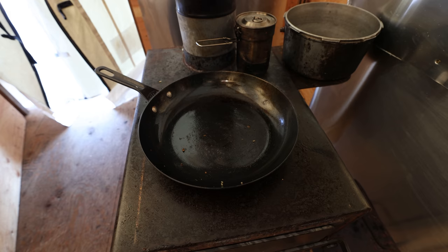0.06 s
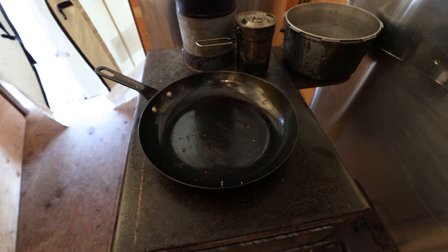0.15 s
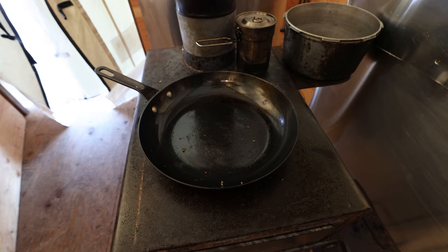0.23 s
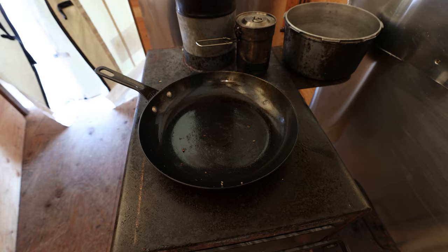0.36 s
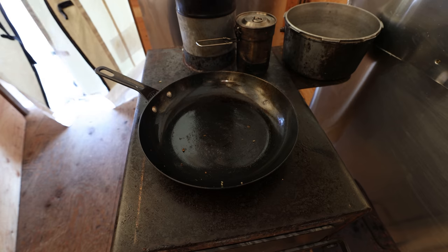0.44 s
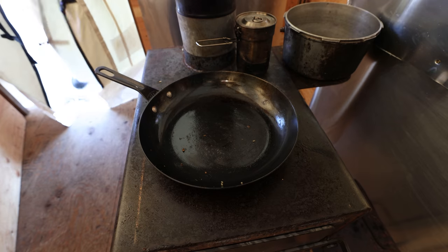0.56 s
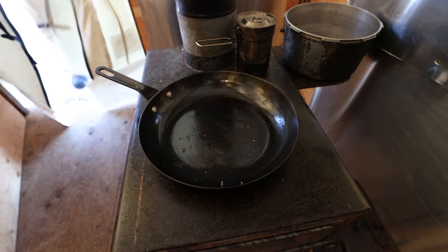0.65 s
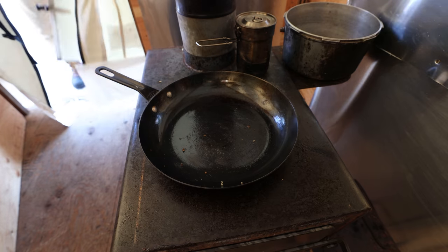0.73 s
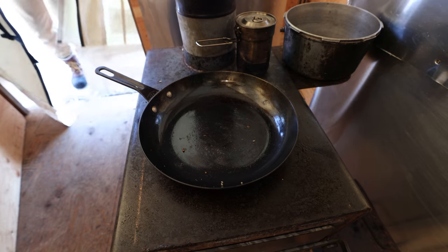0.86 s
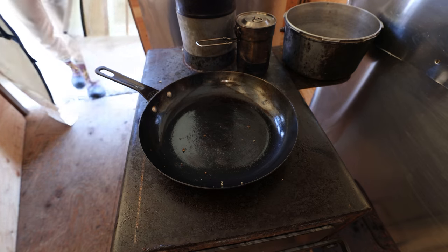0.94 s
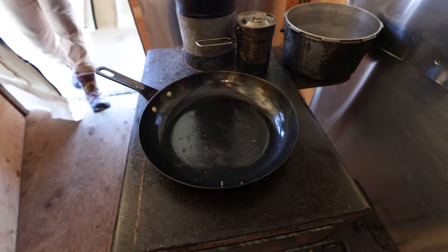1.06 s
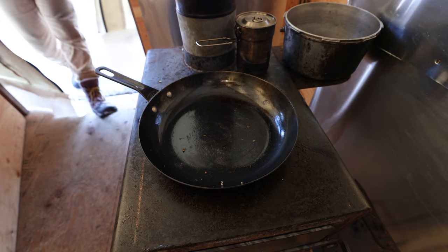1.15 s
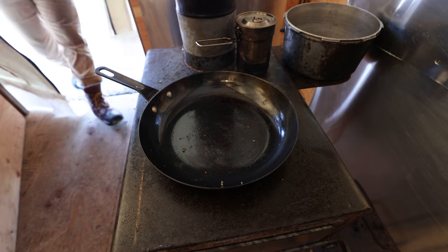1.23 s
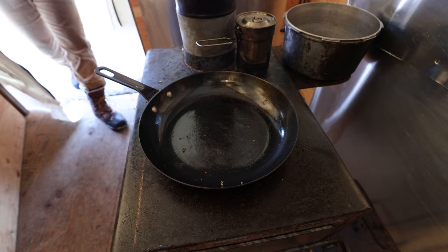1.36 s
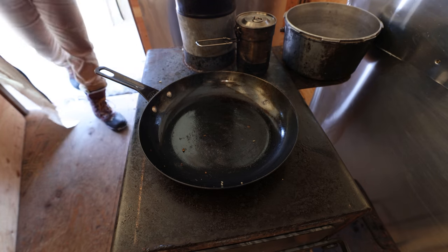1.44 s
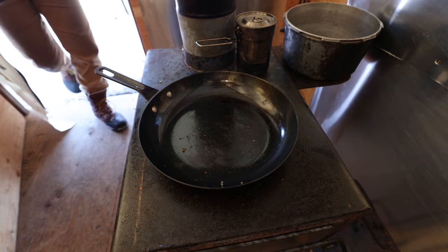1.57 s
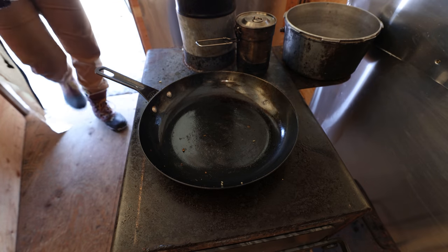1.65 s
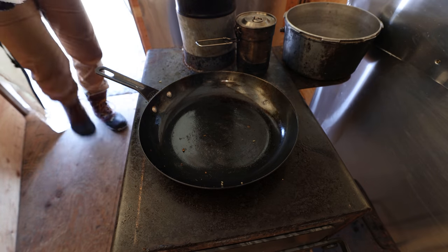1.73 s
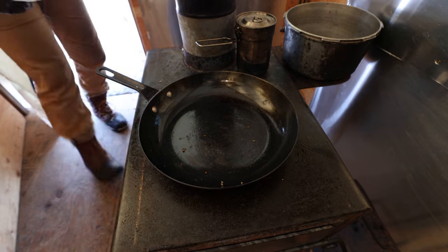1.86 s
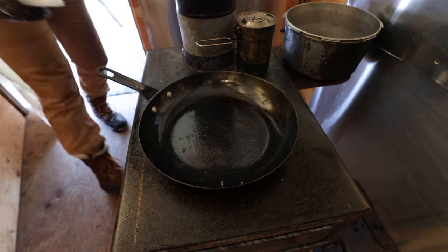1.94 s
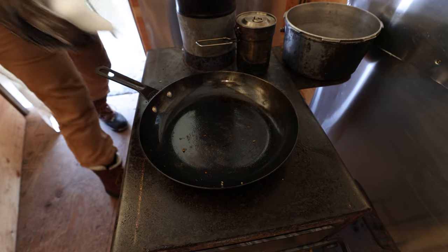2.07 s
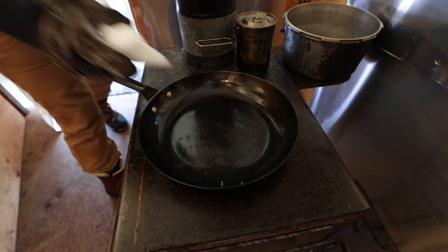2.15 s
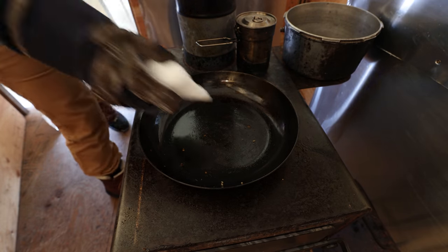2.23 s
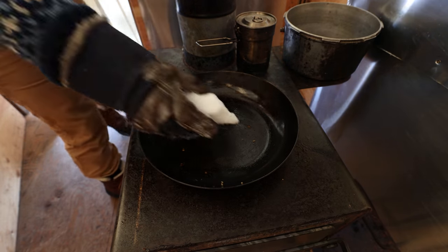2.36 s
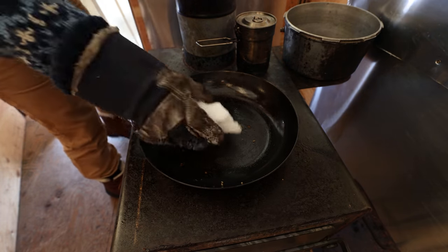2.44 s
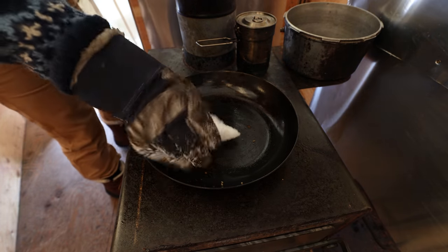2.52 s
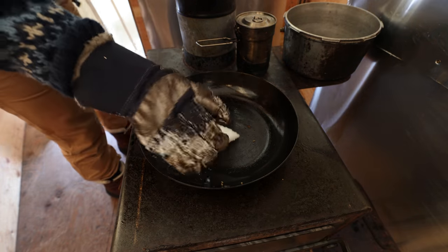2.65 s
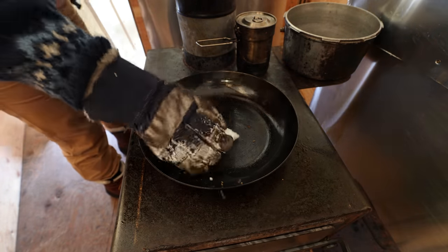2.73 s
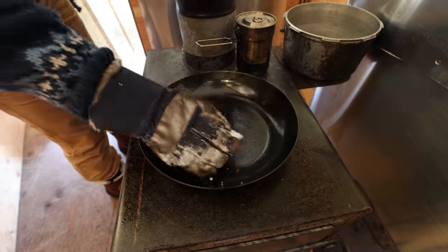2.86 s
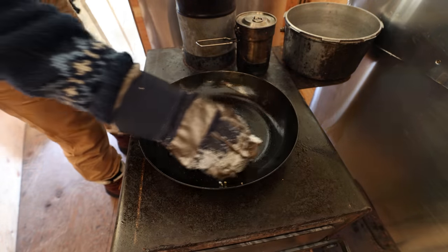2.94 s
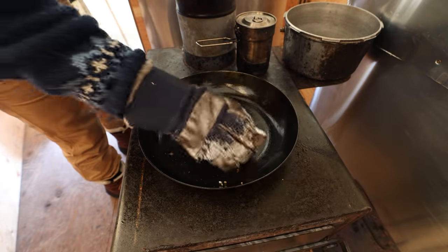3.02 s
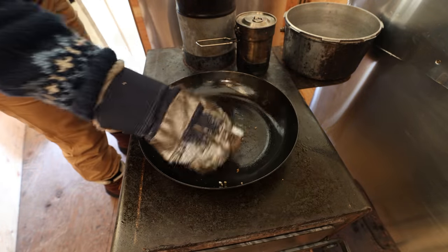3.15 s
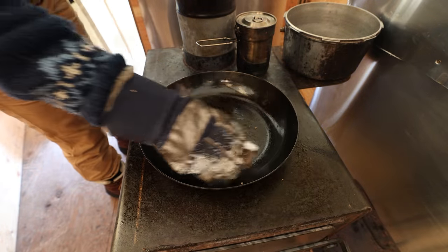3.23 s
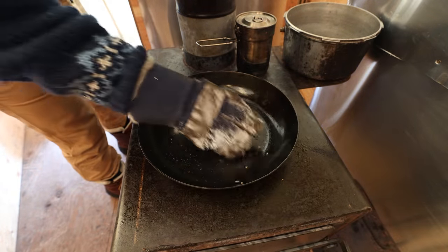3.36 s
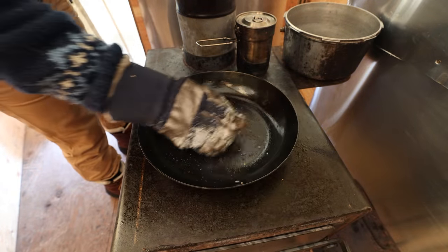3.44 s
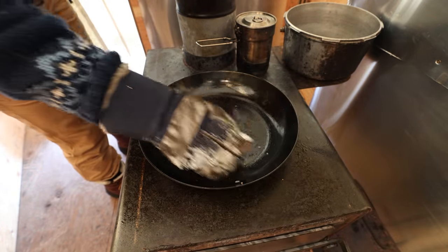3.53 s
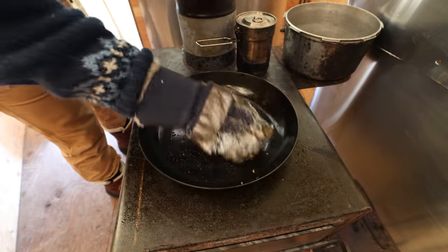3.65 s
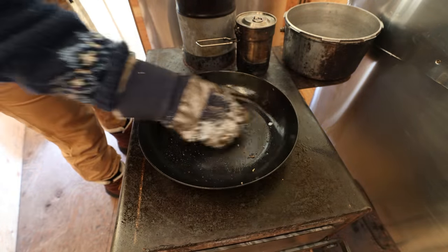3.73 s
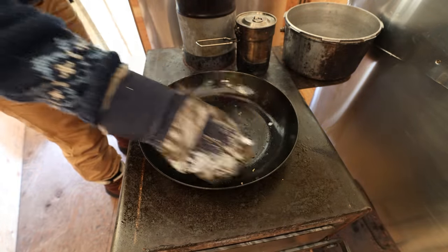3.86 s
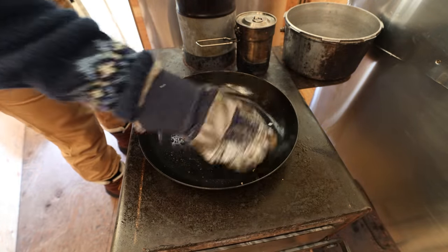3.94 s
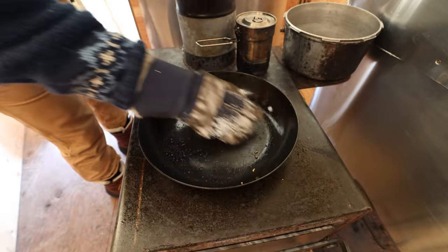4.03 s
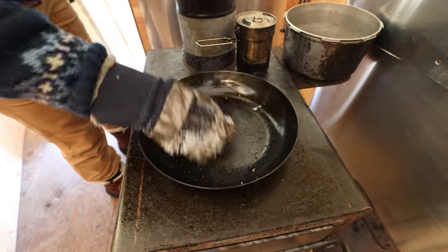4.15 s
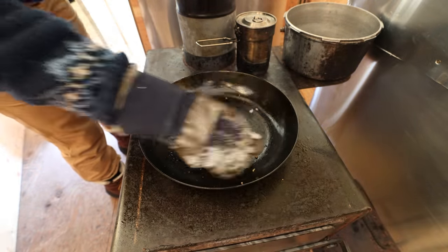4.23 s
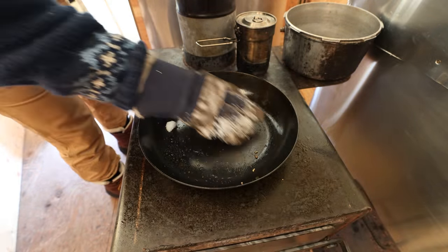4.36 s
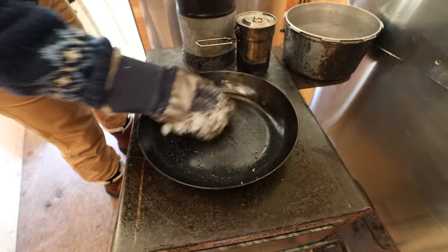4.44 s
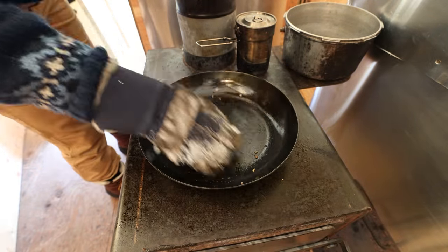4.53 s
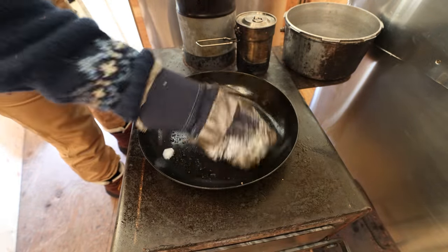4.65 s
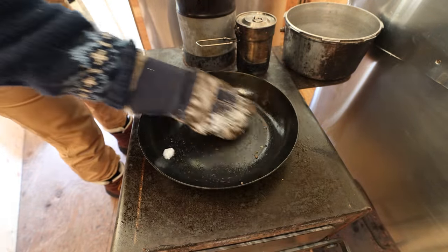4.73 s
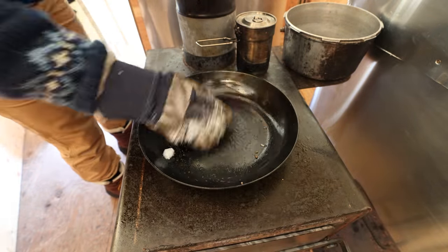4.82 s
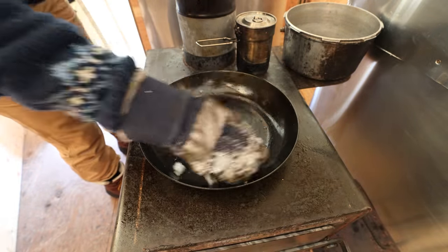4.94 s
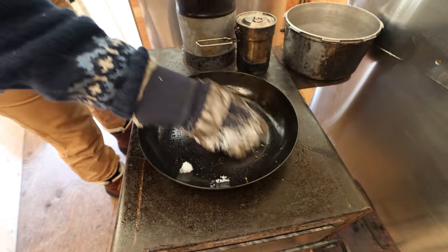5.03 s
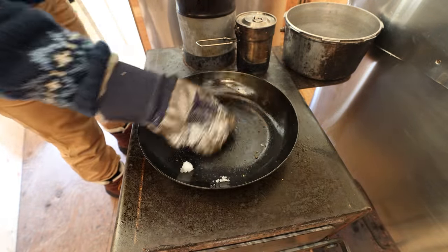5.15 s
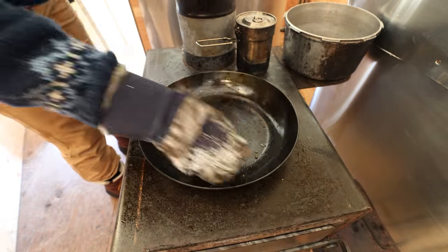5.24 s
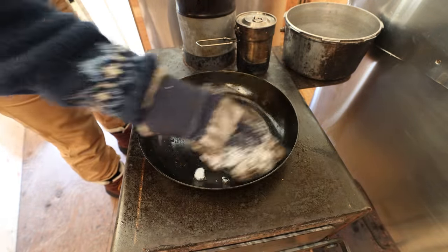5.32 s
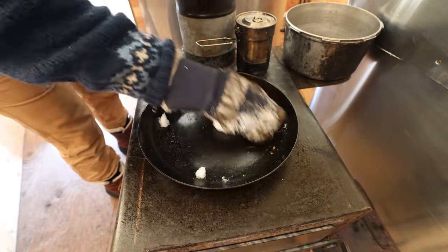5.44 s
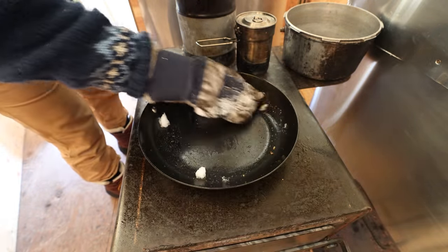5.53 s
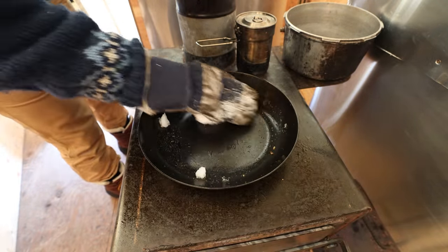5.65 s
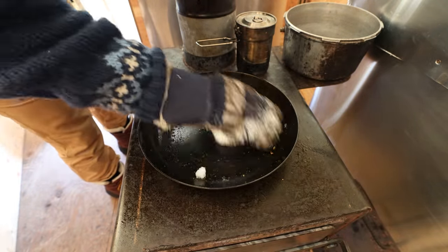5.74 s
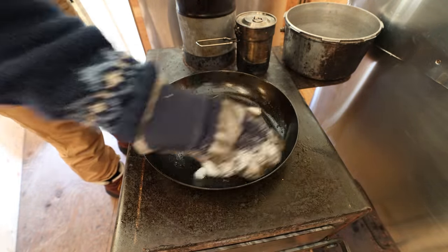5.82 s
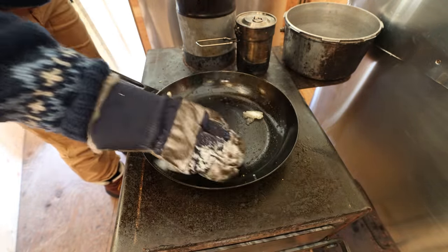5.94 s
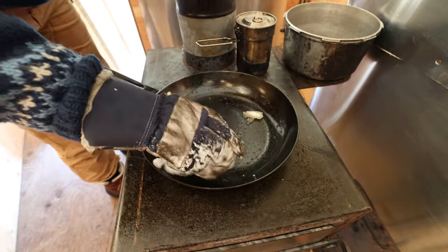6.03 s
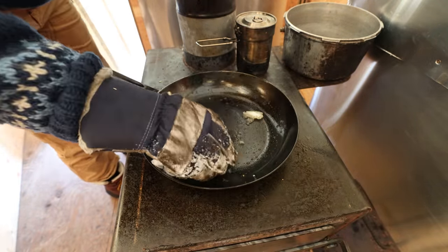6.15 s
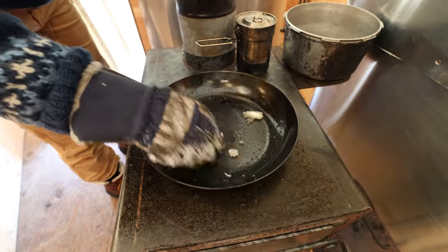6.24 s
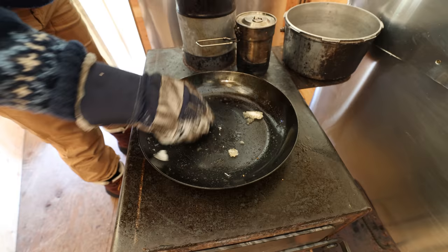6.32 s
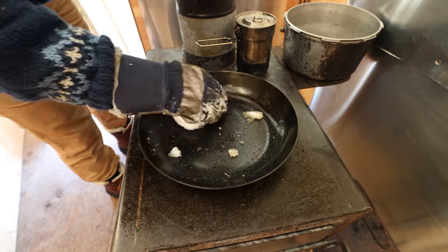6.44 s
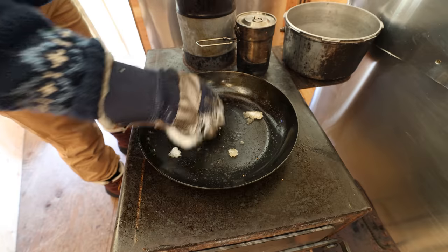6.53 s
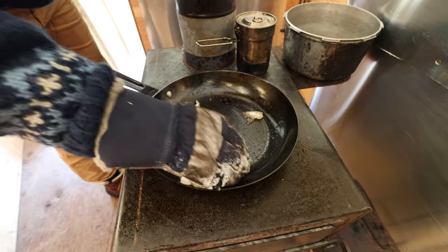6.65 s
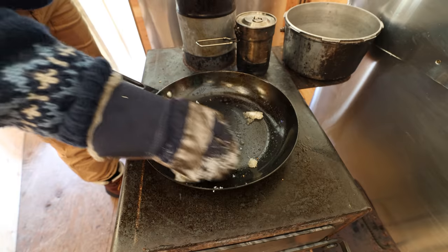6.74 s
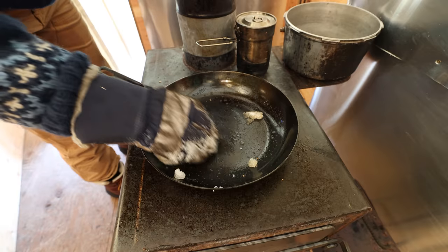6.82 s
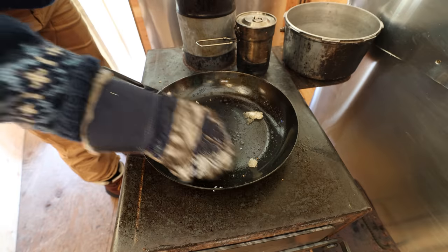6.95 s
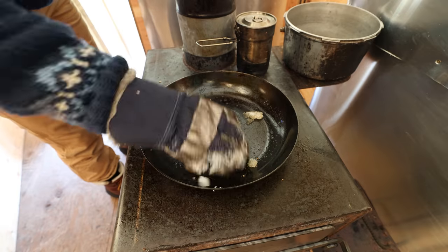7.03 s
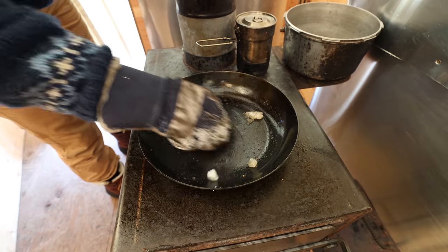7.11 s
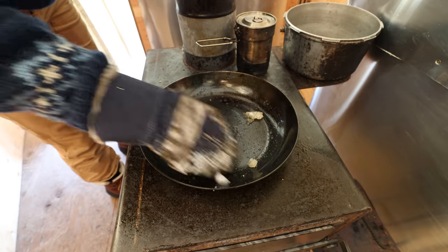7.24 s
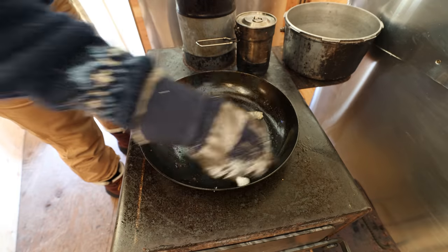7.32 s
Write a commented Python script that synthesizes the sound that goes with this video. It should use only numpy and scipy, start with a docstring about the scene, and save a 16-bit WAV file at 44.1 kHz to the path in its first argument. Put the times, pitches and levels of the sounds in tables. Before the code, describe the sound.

Near microphone by the pan, short dry tent reflections. Someone a little farther off comes through a canvas flap with soft rustles, crackling snaps and low footfalls. Two hard metallic, crumbly blows land close together, loose grains scatter, and coarse snow scrubs rhythmically over ringing steel under a mitten. Later strokes are quieter and broken up, while the pan shifts and clunks on the stove top.

```python
"""A stove rumbles unevenly over a faint hiss in a tent. Someone steps in through the canvas flap: cloth rustles as
clumped grains, snaps are gritty bursts through a resonance, boots thud as decaying sines. From about 2.5 s a lump
of coarse snow is knocked on a steel pan, ringing its modes; loose snow scatters. The pan shifts and knocks on the
stove top as the lump is scrubbed round with a mitten, its crystals heard directly and through the pan's modes."""
import sys
import numpy as np
from scipy import signal
from scipy.fft import rfft, irfft, next_fast_len
from scipy.io import wavfile
from scipy.ndimage import uniform_filter1d, map_coordinates

SR = 44100
rng = np.random.default_rng(int(sys.argv[2]) if len(sys.argv) > 2 else 0)


def digitize_waveform(pressure):
    """Quantize a signal to 16-bit integers and store it at the path in sys.argv[1].

    Rows of a 2-D input are taken as channels; values are limited to [-1, 1].
    """
    field = np.atleast_2d(pressure).T
    bounded = np.clip(field, -1, 1)
    quanta = np.round(bounded * 32767).astype(np.int16)
    wavfile.write(sys.argv[1], SR, quanta)


N = 325458
TIME = np.arange(N) / SR
SWELL_STEEPNESS = 2.07  # how fast a movement fades either side of its middle
TOP_HZ = 15780


def amp(db):
    """Gain of a level in dB."""
    return 10 ** (np.asarray(db) / 20)


def unit(x):
    """Scaled to rms 1."""
    return x / np.sqrt(np.mean(x ** 2) + 1e-20)


def along(points, hz):
    """(Hz, value) points read on a log frequency axis."""
    f, value = np.transpose(points)
    return np.interp(np.log(hz + 1), np.log(f + 1), value)


def filtered(x, response):
    """x times a complex response of frequency."""
    m = next_fast_len(x.shape[-1] + SR // 2)
    spectrum = rfft(x, m) * response(np.fft.rfftfreq(m, 1 / SR))
    return irfft(spectrum, m)[..., :x.shape[-1]]


def coloured(x, points):
    """x with its spectrum weighted by (Hz, dB) points."""
    return filtered(x, lambda f: amp(along(points, f)))


def modes(table, damping=1):
    """Causal response of resonances, alternating in sign; damping scales their widths."""
    def response(f):
        total = 0
        for k, (hz, width, db) in enumerate(table):
            drive = 1j * f * width
            total = total + (-1) ** k * amp(db) * drive / (hz * hz - f * f + drive * damping)
        return total
    return response


def below(hz):
    """Low-pass, 24 dB per octave."""
    return lambda f: 1 / (1 + 1j * f / hz * np.sqrt(2) - (f / hz) ** 2) ** 2


def above(hz):
    """High-pass, 24 dB per octave."""
    return lambda f: (f / hz) ** 4 * below(hz)(f)


def wobble(rate):
    """A smooth random curve, rate knots a second."""
    return map_coordinates(rng.standard_normal(int(N * rate / SR) + 4), [TIME * rate])


def grit(spread_db, clump_db):
    """A dense hail of tiny breaks of unequal but bounded size, coming in clumps; rms 1."""
    rank = np.minimum(rng.exponential(size=N), 5)
    clumps = wobble(30) + wobble(160)
    return unit(amp(spread_db * rank + clump_db * clumps) * rng.standard_normal(N))


def patchy(x, depth_db):
    """The colour drifts as the contact moves: a random gain field, smooth in time and frequency."""
    z = signal.stft(x, nperseg=512)[2]
    field = uniform_filter1d(rng.standard_normal(z.shape), 6, 0)
    field = unit(uniform_filter1d(field, 10, 1))
    return signal.istft(z * amp(depth_db * field), nperseg=512)[1][:N]


def swells(rows):
    """Gain curves swelling to each row's middle: the main level, then each part set over it."""
    middle, length, db, *over = np.transpose(rows)
    coarse = TIME[::32]
    offset = 2 * (coarse - middle[:, None]) / length[:, None]
    power = (1 + offset ** 2) ** -SWELL_STEEPNESS
    return [np.interp(TIME, coarse, np.sqrt(amp(2 * (db + part)) @ power)) for part in [0, *over]]


def add(out, s, db, x):
    """Lay x into out at time s with its peak at db."""
    at = round(s * SR)
    out[at:at + len(x)] += (amp(db) * x / np.abs(x).max())[:N - at]


# Low stove rumble. Each row: time in seconds, level in dB before the random wobble.
STOVE_RUMBLE = [(0.0, -56.5), (.5, -61), (.82, -53), (2.03, -57.5), (2.35, -50.5), (2.94, -58), (3.9, -55),
                (5.24, -58), (6.47, -56), (7.38, -56)]
# Spectrum of the still air. Each row: frequency in Hz, relative density in dB per Hz.
AIR_SPECTRUM = [(60, -21), (150, 1.5), (400, -0.5), (900, -6.5), (1600, -12), (3000, -20), (6000, -26),
                (15800, -28)]
HISS_DB = -62


def air():
    """The stove draws with an uneven rumble over a faint steady hiss."""
    rumble = unit(filtered(rng.standard_normal(N), lambda f: below(75)(f) * above(24)(f)))
    hiss = unit(coloured(rng.standard_normal(N), AIR_SPECTRUM))
    rumble_db = np.interp(TIME, *np.transpose(STOVE_RUMBLE)) + 2.1 * wobble(10)
    return amp(rumble_db) * rumble + amp(HISS_DB) * hiss


# Spectrum of dragged cloth. Each row: frequency in Hz, relative density in dB per Hz.
CLOTH_SPECTRUM = [(59, -28), (100, -9.5), (193, -6.5), (405, -5), (511, -6), (673, -7.5), (1190, -4.5),
                  (1500, -9.5), (2840, -9), (15800, -31.5)]
# Movements of canvas and clothes. Each row: middle in seconds, length in seconds, rustle in dB,
# treble over the rustle in dB, body over the rustle in dB.
CLOTH_MOVES = [(0, 0.073, -49, -12, -21), (.27, 0.04, -58, -13, -0.5), (.57, 0.093, -45.5, -13, -5.5),
               (.7, 0.11, -46.5, -19, -4), (.84, 0.09, -46, -12, -1.5), (.97, 0.2, -54, -28, -0.5),
               (1.12, 0.26, -47, -17, -4.5), (1.23, 0.045, -55, -6, 7), (1.33, 0.12, -40, -18, -7.5),
               (1.48, 0.14, -43, -8, -8), (1.67, 0.27, -61, -22, -5), (1.82, 0.25, -48.5, -14.5, -2.5),
               (2.0, 0.068, -56, -9, 1), (2.18, 0.085, -44.5, -18, -3), (2.3, 0.072, -44, -25, -4.5),
               (2.39, 0.054, -47, -15, 4.5), (2.54, .1, -50.5, -20.5, 2)]


def rustle():
    """Stiff cloth drags and folds: clumped crackling grains."""
    level, treble_level, body_level = swells(CLOTH_MOVES)
    drag = coloured(patchy(grit(spread_db=3, clump_db=1.5), depth_db=0.7), CLOTH_SPECTRUM)
    body, treble = filtered(drag, below(1480)), filtered(drag, above(9000))
    middle = drag - body - treble
    return level * unit(middle) + treble_level * unit(treble) + body_level * unit(body)


# Snow, boots and fasteners snap. Each row: start in seconds, peak in dB, centre in Hz,
# treble over the peak in dB, t60 of the crumbling in seconds.
STEP_SNAPS = [(0.175, -44, 1260, -29, 0.037), (0.254, -40.5, 1510, -40, 0.077),
              (0.49, -35, 635, -65, 0.034), (0.53, -37, 5460, 0, 0.038), (0.681, -51, 2400, -12, 0.039),
              (0.801, -38, 1790, -19, 0.05), (1.222, -34, 600, -28, 0.084), (1.287, -24, 3500, -18, 0.022),
              (1.311, -27, 3770, -7, 0.018), (1.325, -18, 650, -37, 0.033), (1.339, -38, 600, -6, 0.011),
              (1.38, -29, 1500, -6, 0.018), (1.447, -20.5, 915, -25, 0.15), (1.458, -22, 2500, -16, 0.024),
              (1.494, -25, 1350, -40, 0.026), (1.5631, -11.5, 1000, -29, 0.029),
              (1.917, -23.5, 1360, -49, 0.038), (2.081, -36, 930, -29, 0.08),
              (2.362, -33.5, 1950, -15, 0.12)]
# Boots land on the boards. Each row: start in seconds, peak in dB, frequency in Hz, t60 in seconds.
BOOT_THUDS = [(.499, -45, 359, .06), (.56, -37.5, 244, 0.019), (0.865, -41, 113, 0.041),
              (1.233, -37, 300, 0.012), (1.321, -38, 92, 0.072), (1.446, -40, 209, 0.24),
              (1.566, -37.5, 211, 0.038), (1.739, -42, 420, 0.072), (2.095, -24.5, 139, 0.054),
              (2.117, -45, 150, 0.038), (2.146, -38, 194, 0.1), (2.379, -39.5, 185, 0.05)]


def steps():
    """Each snap is a gritty crack coloured by a broad resonance; each thud a short low swing of the boards."""
    out, t = np.zeros(N), np.arange(SR // 4) / SR
    shape = (len(STEP_SNAPS), len(t))
    grains = rng.standard_normal(shape) * amp(4.16 * rng.exponential(size=shape))
    for (s, db, hz, treble_db, t60_s), burst in zip(STEP_SNAPS, grains):
        burst = burst * (amp(-60 * t / t60_s) + 0.5 * amp(-60 * t / 0.0033))  # crumbling + sharp break
        add(out, s, db, filtered(burst, modes([(hz, .55 * hz, 0)])))
        add(out, s, db + treble_db, filtered(burst, lambda f: above(1600)(f) * below(10000)(f)))
    for s, db, hz, t60_s in BOOT_THUDS:
        envelope = amp(-60 * t / t60_s) * (1 - np.exp(-t / 0.0015))
        add(out, s, db, envelope * np.sin(2 * np.pi * hz * t))
    return out


# Decay of the tent. Each row: frequency in Hz, t60 in seconds.
TENT_DECAY = [(150, 0.39), (1200, 0.19), (5000, 0.15), (15000, 0.042)]


def tent(x):
    """Canvas and boards answer briefly; each frequency dies at its own speed."""
    hz, t, z = signal.stft(rng.standard_normal(SR // 3), SR, nperseg=256)
    decay = amp(-60 * t / along(TENT_DECAY, hz)[:, None])
    tail = signal.istft(z * decay, SR, nperseg=256)[1]
    return signal.fftconvolve(np.pad(x, (200, 0)), tail / np.linalg.norm(tail))[:N]


# The pan wall. Each row: mode in Hz, width under the hand in Hz, relative level in dB.
PAN_WALL = [(1536, 50, -1), (2030, 190, -1.5), (2290, 43, -6.5), (2864, 71, -1), (3275, 48, -17.5),
            (3760, 44, -5), (3980, 230, -5.5), (4820, 86, -0.5), (5606, 123, -2.5), (6010, 280, -9),
            (6520, 110, -6), (7080, 54, -7.5), (7480, 210, -9.5), (8090, 100, -8), (8480, 210, -9.5),
            (8960, 160, -16), (9290, 95, -11), (9570, 49, -12), (9700, 67, -11), (10490, 60, -9.5),
            (11040, 40, -14), (11550, 120, -10.5), (11900, 80, -15), (12650, 120, -11), (13200, 80, -20),
            (14100, 310, -14), (15950, 160, -14.5)]
# Air under the mitten. Each row: resonance in Hz, width at damping 1 in Hz, relative level in dB.
MITTEN_HOLLOW = [(1170, 570, 2.5), (1410, 218, 7)]
# The lump strikes the pan. Each row: start in seconds, body peak in dB, treble over it in dB,
# hollow over it in dB.
LUMP_BLOWS = [(2.506, -43, -23, -3), (2.5735, -13.5, -3, -5), (2.661, -32, -4, -10),
              (2.6728, -5.5, -4, -8.5), (2.821, -43, -14, -20), (2.8484, -26, -12, -1),
              (2.9342, -25, -2, 0), (4.2128, -23, 7, 4), (5.36, -20, -10, 0.5), (6.2038, -31.5, 11, 0),
              (6.2647, -31, 3, 0), (6.6307, -38, 1, 2), (6.6972, -27, -13, -10), (6.7251, -27, 17.5, 1),
              (6.7895, -26.5, 9, -1), (6.9611, -21, -4, -7), (7.0404, -30, -10, 4), (7.0844, -27, 5, -6),
              (7.1945, -26, 4, -2)]
SOFT_HZ = 3100  # snow is soft: a blow drives the upper modes less
CRUMBLE_T60_S = .03


def blows():
    """The lump shatters on the free pan, whose modes then ring longer than under the hand."""
    out, t = np.zeros(N), np.arange(SR // 4) / SR
    crumble = amp(-60 * t / CRUMBLE_T60_S) * (1 - np.exp(-t / 0.00013))
    push = rng.standard_normal((len(LUMP_BLOWS), len(t))) * crumble
    push[:, 12] += amp(24)  # the hard first contact starts all modes together
    crack = amp(-13.5) * filtered(push, above(880))
    ring = filtered(push, modes(PAN_WALL, damping=.55)) + crack
    bodies = filtered(ring, lambda f: below(6500)(f) / (1 + 1j * f / SOFT_HZ))
    trebles = filtered(ring, above(5600))
    hollows = filtered(push, modes(MITTEN_HOLLOW, damping=0.98))
    for (s, db, treble_db, hollow_db), body, treble, hollow in zip(LUMP_BLOWS, bodies, trebles, hollows):
        add(out, s, db, body)
        add(out, s, db + treble_db, treble)
        add(out, s, db + hollow_db, hollow)
    return out


# Crystals heard directly. Each row: frequency in Hz, relative density in dB per Hz.
CRUNCH_SPECTRUM = [(150, -115), (350, -4), (800, -4), (1800, -0.5), (3300, 1), (5000, -5), (6800, -9.5),
                   (10000, -15), (15800, -23)]
# Strokes of the lump over the pan. Each row: middle in seconds, length in seconds, crunch in dB,
# treble over the crunch in dB, hollow under the mitten over the crunch in dB.
LUMP_STROKES = [(2.85, 0.032, -36.5, -14, -2.5), (2.97, 0.029, -38.5, -10, 5), (3.05, 0.11, -31, -7, -3),
                (3.17, 0.095, -28.5, -12, -6), (3.29, 0.16, -30, -9, 0.5), (3.46, 0.16, -24.5, -11, -8),
                (3.64, 0.11, -28, -12.5, -3), (3.79, 0.15, -25.5, -11.5, -9.5), (3.97, 0.12, -30.5, -9, -2),
                (4.12, .1, -24.5, -9, -17), (4.24, .04, -32.5, -11, -4), (4.32, 0.082, -30, -13.5, 0),
                (4.47, 0.18, -28.5, -7.5, -9), (4.66, 0.094, -31, -10, 0.5), (4.81, 0.11, -29, -10, -12),
                (5.0, 0.16, -30.5, -10, -3.5), (5.15, 0.049, -30.5, -9.5, -17), (5.3, 0.22, -34, -15, -5.5),
                (5.45, 0.15, -34, -7.5, -4.5), (5.6, .12, -35.5, -0.5, -6.5), (5.68, 0.031, -42, -1, -6),
                (5.77, 0.036, -34.5, -11, -12), (5.86, 0.096, -34.5, -10, -7.5),
                (5.96, 0.063, -37, -3.5, -2.5), (6.03, 0.047, -39.5, -6, -3), (6.17, .06, -44.5, -16, -9),
                (6.29, 0.029, -38, -9, -4), (6.38, 0.069, -38.5, -2.5, -1.5), (6.43, .1, -35, -4.5, -5.5),
                (6.64, 0.03, -45, -21, -4), (6.72, 0.087, -35, -8, -8.5), (6.86, 0.2, -40, -8, -5),
                (7.07, 0.085, -40.5, -8, -10), (7.2, 0.093, -38, -12, -11), (7.35, 0.11, -40, -8.5, -6)]
TOUCH_S = 2.821  # the lump comes to rest on the pan
SCATTER_DB, SCATTER_T60_S = -23, 0.25  # loose snow settling after a blow, relative to its peak
SCATTER_TREBLE_DB, SCATTER_HOLLOW_DB = -13, -8.5  # relative to the scatter


def scrub():
    """Breaking crystals are heard directly and drive the modes of wall and hollow."""
    start_s, peak_db = np.transpose(LUMP_BLOWS)[:2]
    after = TIME - start_s[:, None]
    settling = amp(-60 * np.abs(after) / SCATTER_T60_S) * (after > 0)
    scatter = amp(peak_db + SCATTER_DB) @ settling
    levels = (TIME > TOUCH_S) * np.array(swells(LUMP_STROKES))
    levels = levels + scatter * amp([[0], [SCATTER_TREBLE_DB], [SCATTER_HOLLOW_DB]])
    crunch_level, treble_level, hollow_level = levels
    rub, breaks = grit(spread_db=2.5, clump_db=1.63), grit(spread_db=4.5, clump_db=0.6)
    wall = unit(filtered(rub, modes(PAN_WALL)))
    direct = unit(coloured(breaks, CRUNCH_SPECTRUM))
    sound = patchy(wall + amp(-2.0) * direct, depth_db=1.6)
    body, treble = unit(filtered(sound, below(5440))), unit(filtered(sound, above(5950)))
    hollow = unit(patchy(filtered(rub, modes(MITTEN_HOLLOW)), depth_db=1.5))
    return crunch_level * body + treble_level * treble + hollow_level * hollow


# The pan bottom. Each row: mode in Hz, width at damping 1 in Hz, relative level in dB.
PAN_BOTTOM = [(231, 11, 0), (335, 35, -19), (508, 16, -4), (592, 24, -7), (622, 14, -8), (860, 90, -22),
              (1030, 80, -22), (1495, 9, -9)]
# The stove plate. Each row: mode in Hz, width in Hz, relative level in dB.
STOVE_PLATE = [(145, 45, 7), (156.3, 17.6, 8.5)]
# The pushed pan shifts. Each row: middle in seconds, length in seconds, bottom chatter in dB,
# plate drone over the chatter in dB.
PAN_SHIFTS = [(2.7, 0.21, -51, 8.5), (3.5, 1, -49.5, -12), (4.2, .3, -48.5, -7.5), (4.54, 0.058, -39, -10),
              (4.85, 0.13, -47.5, -10), (5.22, 0.18, -44, -9), (5.66, .2, -40.5, -20),
              (6.05, 0.55, -50.5, -15), (6.4, 0.26, -49, -1), (6.97, 0.45, -43, -4), (7.27, 0.14, -41, -8)]


def rocking():
    """The pushed pan shifts on the stove in uneven lumps, driving the modes of its bottom and the plate."""
    chatter_level, plate_level = swells(PAN_SHIFTS)
    chatter = unit(filtered(grit(spread_db=5, clump_db=3.5), modes(PAN_BOTTOM, damping=2.5)))
    plate = unit(filtered(grit(spread_db=-1.0, clump_db=2.5), modes(STOVE_PLATE)))
    started = TIME > LUMP_BLOWS[1][0]  # silent until the second blow
    return started * (chatter_level * chatter + plate_level * plate)


# The pan tips and knocks on the stove top. Each row: start in seconds, peak of the two lowest modes in dB,
# upper bottom modes over it in dB, crack over it in dB.
PAN_KNOCKS = [(2.576, -35, 1, 13), (2.674, -27.5, 1.5, 4), (5.166, -34, -21, -5), (5.603, -37, 1.5, -8),
              (6.205, -38.5, 0, 14.5), (6.777, -32, -6, -12), (6.819, -22.5, -8, -28),
              (6.864, -32, -15, -1), (6.9154, -18, -8, -17), (6.9336, -23.5, 9, 15), (6.9601, -29, 8, 1),
              (6.9868, -26, -9, -9), (7.106, -36, -15, -16), (7.136, -30, -21, -15), (7.158, -31.5, -6, -4),
              (7.211, -32.5, 2.5, -6), (7.271, -30, -16, -17)]


def knocks():
    """Steel on steel: a short push rings the bottom modes, with a dull crack on top."""
    out, t = np.zeros(N), np.arange(SR // 2) / SR
    push = (1 + 1.4 * rng.standard_normal((len(PAN_KNOCKS), len(t)))) * amp(-60 * t / 0.0016)
    crack = push + 0.66 * rng.standard_normal(push.shape) * amp(-60 * t / 0.04)
    lows = filtered(push, lambda f: modes(PAN_BOTTOM[:2], damping=1.8)(f) * above(140)(f))
    uppers = filtered(push, modes(PAN_BOTTOM[2:], damping=2.7))
    dulls = filtered(crack, lambda f: above(450)(f) * below(1900)(f))
    for (s, db, upper_db, crack_db), low, upper, dull in zip(PAN_KNOCKS, lows, uppers, dulls):
        add(out, s, db, low)
        add(out, s, db + upper_db, upper)
        add(out, s, db + crack_db, dull)
    return out


def scene():
    """The pan is near; the steps, further into the tent, send more of their sound to its answer."""
    far = steps()
    hits = blows() + knocks()
    answer = tent(amp(-15) * hits + amp(-7.5) * far)
    return (air() + rustle() + far + hits + answer + scrub() + rocking())[None]


def record(dry):
    """Nothing is kept above the band limit."""
    return filtered(dry, lambda hz: hz < TOP_HZ)


dry = scene()
out = record(dry)
digitize_waveform(out)
```